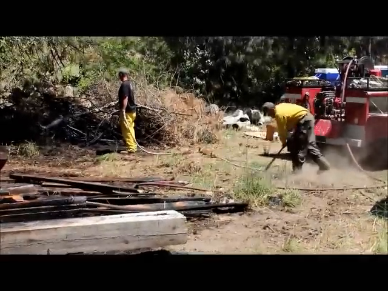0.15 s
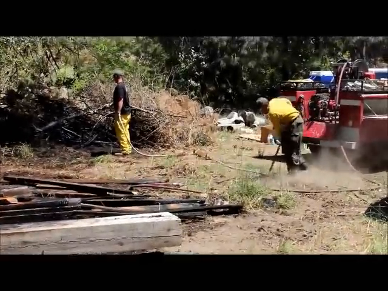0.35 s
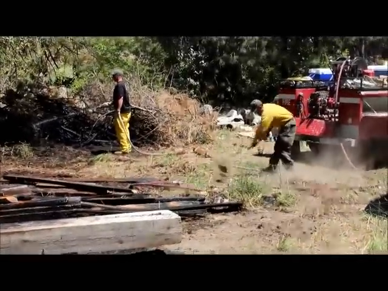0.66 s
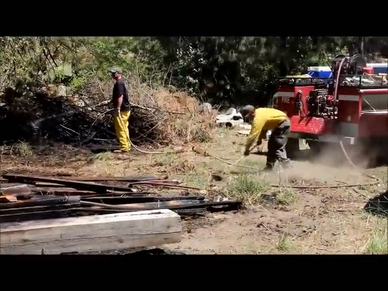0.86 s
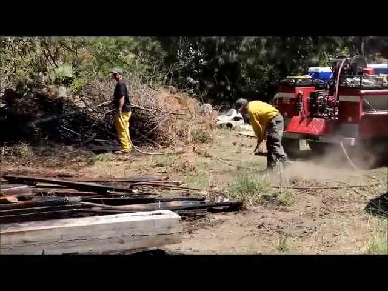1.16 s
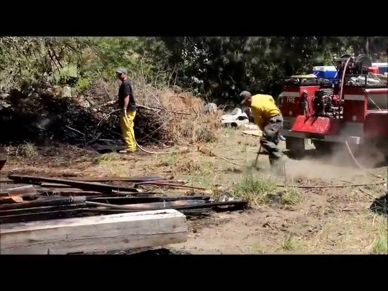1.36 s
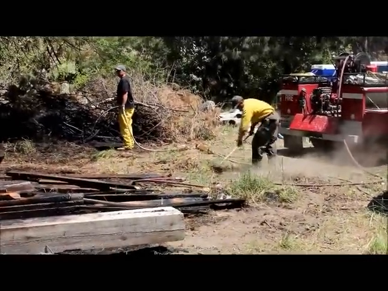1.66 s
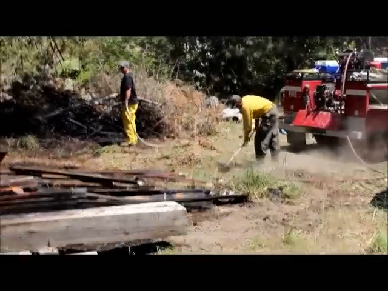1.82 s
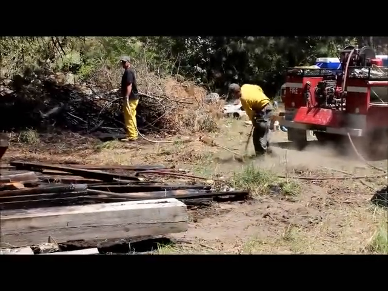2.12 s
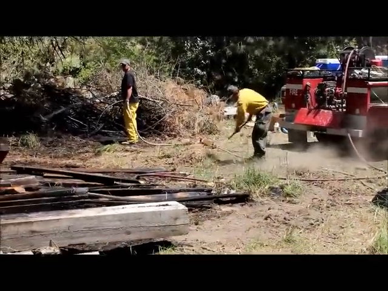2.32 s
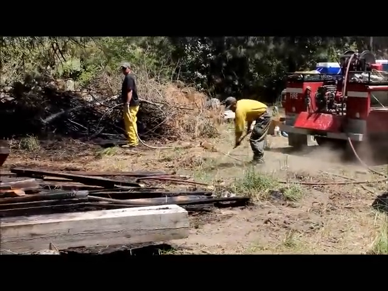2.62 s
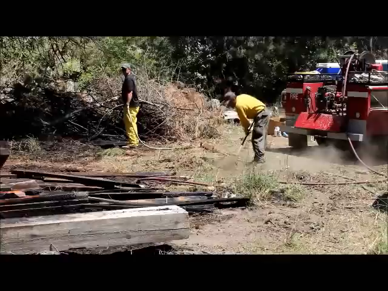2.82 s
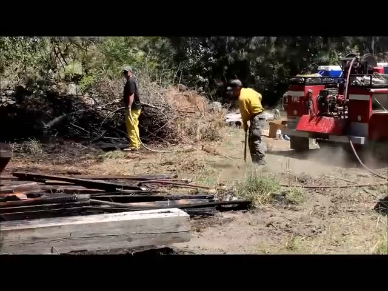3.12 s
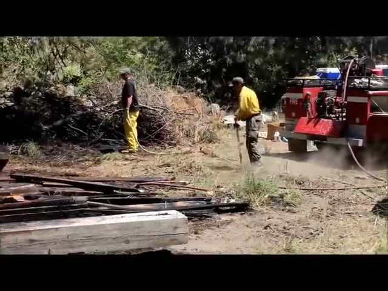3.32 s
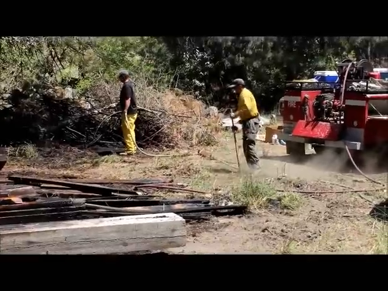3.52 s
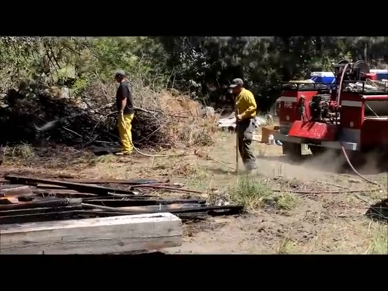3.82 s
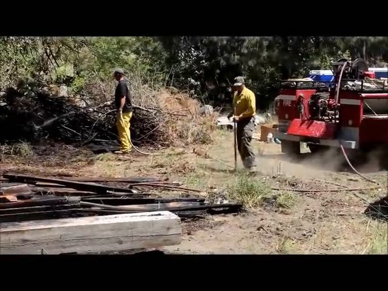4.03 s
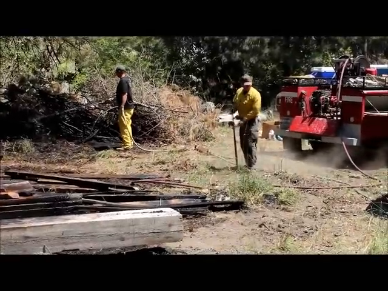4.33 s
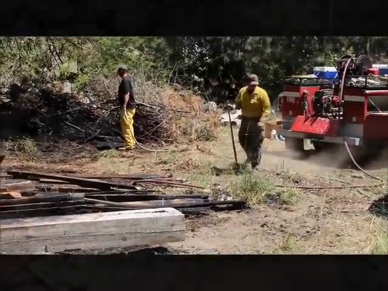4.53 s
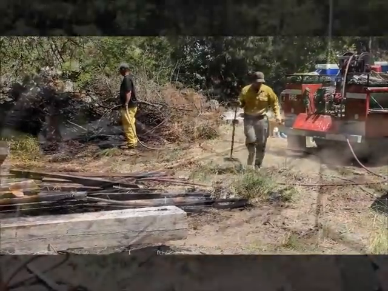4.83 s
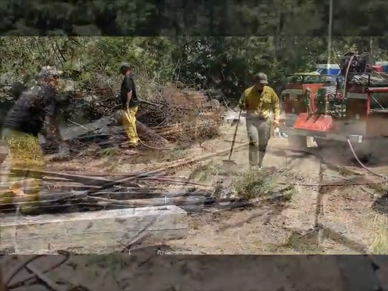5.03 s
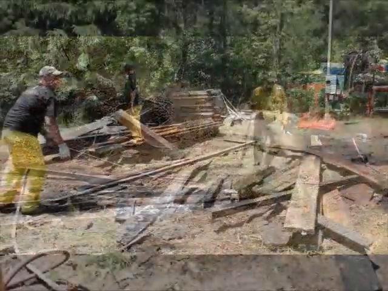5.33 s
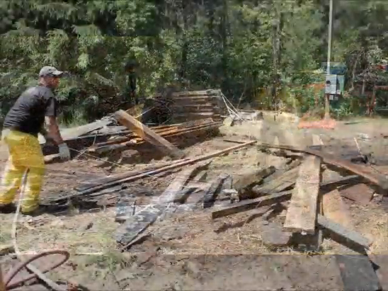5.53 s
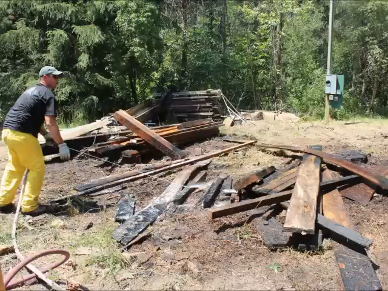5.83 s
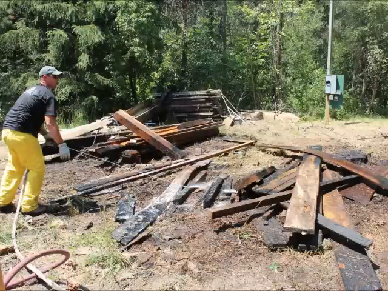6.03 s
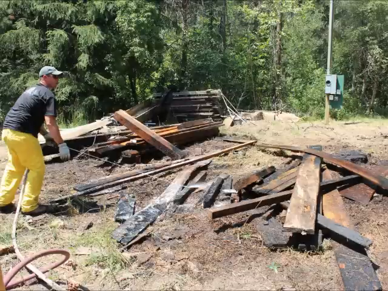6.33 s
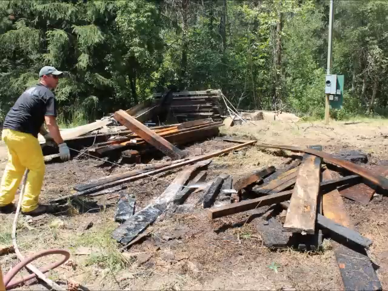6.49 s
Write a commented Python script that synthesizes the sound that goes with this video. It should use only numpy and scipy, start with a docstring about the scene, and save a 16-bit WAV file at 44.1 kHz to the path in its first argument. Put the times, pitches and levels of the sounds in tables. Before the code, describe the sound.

Outdoors in a clearing, a small two-cylinder pump engine on a fire truck runs fast and steady, a throaty drone with rapid thuds, ticking valves, rattling sheet metal and fan noise. A second engine hums underneath. In the first three seconds a hoe bites gritty dirt five times, with faint steel clinks. Just before six seconds everything stops dead. Mono microphone, little echo.

```python
"""Brush truck pump in a clearing

A small air-cooled V-twin pump engine runs near 3280 rpm, its speed hunting slightly under the governor.
Crank harmonics and shaped noise make its thuds, drone and bark; noise bursts make ticks, rattle and hiss.
Steady noise is the cooling fan; a second engine's harmonics and a few panel tones hum below.
A hoe bites the dirt five times in the first three seconds: decaying grit noise and ringing steel.
The microphone hears it in mono, with a short ground bounce on the hiss. Just before six seconds all stops."""
import sys
import numpy as np
from scipy import signal
from scipy.fft import rfft, irfft, next_fast_len
from scipy.io import wavfile
from scipy.ndimage import map_coordinates

SR = 44100
rng = np.random.default_rng(int(sys.argv[2]) if len(sys.argv) > 2 else 0)


def bounce(signal):
    """Save signal as a 16-bit WAV file at the path given by the first command-line argument."""
    frames = np.transpose(np.atleast_2d(signal))
    limited = np.clip(frames, -1, 1)
    pcm = np.round(limited * 32767).astype(np.int16)
    wavfile.write(sys.argv[1], SR, pcm)


N = 293706  # length in samples

PUMP_RPM, SECOND_RPM = 3280, 3468  # set speeds of the two engines
STOP_S = 5.982  # all sound ends here
TOP_HZ = 15740  # upper band limit at the microphone
HISS_DB, HISS_FOLLOWS = -36, 1.8  # gas hiss: level about which it moves, dB per dB of the treble's swing
CLATTER_DB, CLATTER_FOLLOWS = -21, 0.51  # the same for block and shroud, before their own trims
FLUTTER_DB, FLUTTER_PER_S = 0.5, 12  # hiss and clatter waver together: depth, knots per second
JITTER_CYCLES, JITTER_PER_S = 0.004, 4  # the crank strays ahead and behind: depth, knots per second

# The pump engine's note, before it wavers. Each row: multiple of the four-stroke cycle rate, level in dB rms.
PUMP_HARMONICS = [(2, -33.5), (3, -42), (4, -40.5), (5, -29.5), (6, -32), (7, -31.5), (8, -45.5), (9, -34),
                  (10, -38.5), (13, -41.5), (14, -42), (15, -42), (18, -41.5), (19, -44), (21, -46.5),
                  (22, -47), (24, -32.5), (26, -33.5), (27, -36), (28, -34.5), (29, -35.5), (30, -29.5),
                  (31, -33), (32, -28), (33, -38.5), (42, -37.5), (44, -41.5), (48, -45), (50, -40.5),
                  (56, -42.5), (60, -40), (78, -40.5), (84, -43)]
# The second engine's hum, before it wavers. Each row: multiple of its cycle rate, level in dB rms.
SECOND_HARMONICS = [(1, -48.5), (2, -47.5), (3, -35), (4, -36.5), (5, -41.5), (7, -33.5), (8, -43),
                    (10, -35)]
# Humming truck panels. Each row: frequency in Hz, level in dB rms.
PANEL_TONES = [(67, -45), (123.4, -43), (250, -40.5), (257, -43.5)]
# The two cylinders' firings. Each row: place in the cycle 0-1, length in cycles, relative level in dB.
CYLINDER_FIRINGS = [(.17, 0.11, -9.5), (.55, 0.12, -12)]
# Valve contacts. Each row: place in the cycle 0-1, relative level in dB.
VALVE_CONTACTS = [(0.358, -8.5), (0.441, -4), (.58, 0), (.8, -7.5), (.94, -3.5)]
# Spectrum of the low exhaust puffs. Each row: frequency in Hz, relative density in dB per Hz.
PUFF_SPECTRUM = [(40, -30), (80, -7), (130, -7), (230, -1), (300, -2), (390, -3.5), (480, -12.5),
                 (700, -31)]
# Spectrum of the muffler's bark. Each row: frequency in Hz, relative density in dB per Hz.
BARK_SPECTRUM = [(300, -34.5), (500, -12), (620, -1.5), (720, 1), (880, -2), (980, -2.5), (1100, -14),
                 (1600, -32)]
# Spectrum of the shaken engine block. Each row: frequency in Hz, relative density in dB per Hz.
BLOCK_SPECTRUM = [(500, -24.5), (1050, -2), (1650, 1), (2300, -0.5), (2700, -5.5), (4200, -15),
                  (5200, -11.5), (7000, -30.5)]
# Spectrum of the gas hiss. Each row: frequency in Hz, relative density in dB per Hz.
HISS_SPECTRUM = [(2500, -17), (5000, 2), (5900, 1.5), (6300, -2), (7000, -1), (10500, -4.5), (11600, -12),
                 (15900, -13.5)]
# Spectrum of the cooling fan. Each row: frequency in Hz, relative density in dB per Hz.
FAN_SPECTRUM = [(30, -16), (120, 0.5), (500, -6.5), (1500, 1.5), (4000, -8), (7000, -15.5), (12000, -21),
                (16000, -23.5)]
# Ringing sheet metal of the shroud. Each row: frequency in Hz, width in Hz, relative level in dB.
SHROUD_MODES = [(1670, 310, -1.5), (2266, 320, -5), (2875, 170, -0.5), (3487, 150, 2), (3952, 210, 0.5),
                (4594, 110, 0), (5010, 160, -11), (5860, 190, -8.5), (6630, 330, -16)]
# Hoe strokes on grit and stones.
# Each row: start in seconds, grit level in dB, grit pitch in Hz, grit t60 in seconds, blade ring in dB.
HOE_STROKES = [(0.418, -14, 1700, 0.076, -40), (0.774, -18, 4200, 0.068, -37), (1.063, -18, 4990, .06, -20),
               (2.431, -14.5, 1500, .05, -32), (2.79, -24.5, 7000, .04, -36)]
# The hoe's steel blade. Each row: frequency in Hz, level in dB relative to the ring, t60 in seconds.
BLADE_MODES = [(2503, 1, .08), (2934, 0.5, .03), (5790, -2.5, .055), (6627, -6, .055)]
# Course of the muffler's drone and bark. Each row: time in seconds, level in dB.
DRONE_LEVEL = [(0.0, -21), (0.39, -22), (1.22, -20), (5.9, -20)]
# Course of the treble, used for its swing about the mean. Each row: time in seconds, level in dB.
TREBLE_LEVEL = [(0.0, -27), (0.7, -26), (1.55, -28.1), (3.38, -27.2), (3.52, -31.5), (3.7, -27.5),
                (4.35, -29.5), (4.6, -28), (4.78, -31.5), (5.0, -27), (5.42, -30.1), (5.98, -29)]
# The governor hunts. Each row: time in seconds, speed above the set speed in rpm.
GOVERNOR_HUNT = [(0.0, 7), (1.3, 3.5), (1.85, -3.5), (2.35, 0.96), (3.3, 4.5), (3.75, -2.5), (4.8, 1.08),
                 (5.25, -10.1), (5.98, 6)]


def amp(db):
    """Decibels to gain."""
    return 10 ** (np.asarray(db) / 20)


def unit(x):
    """Scale to rms 1."""
    return x / np.sqrt(np.mean(x ** 2) + 1e-20)


def curves(rows):
    """One value per sample for each column after the time."""
    seconds, *columns = np.transpose(rows)
    return [np.interp(np.arange(N) / SR, seconds, column) for column in columns]


def wobble(rate):
    """A smooth random curve through normal draws, rate knots a second."""
    knots = rng.standard_normal(int(N * rate / SR) + 4)
    return map_coordinates(knots, [np.arange(N) * rate / SR], order=2)


def filtered(x, response):
    """x times a response of frequency."""
    m = next_fast_len(N + 8192)  # padded so the end does not wrap onto the start
    return irfft(rfft(x, m) * response(np.fft.rfftfreq(m, 1 / SR)), m)[:N]


def coloured(x, points):
    """x through a (Hz, dB) spectrum with closed ends, at rms 1."""
    hz, db = np.transpose(points)

    def response(f):
        return amp(np.interp(np.log(f + 1), np.log(hz), db, left=-120, right=-120))

    return unit(filtered(x, response))


def ringing(x, modes):
    """x through (Hz, width, dB) resonances of alternating sign, at rms 1."""
    def response(f):
        total = 0
        for k, (centre, width, db) in enumerate(modes):
            damping = 1j * f * width
            total = total + (-1) ** k * amp(db) * damping / (centre ** 2 - f * f + damping)
        return total

    return unit(filtered(x, response))


def noise():
    """Fresh white noise."""
    return rng.standard_normal(N)


def tone(turns):
    """A sine of rms 1 that starts anywhere in its period."""
    return np.sqrt(2) * np.sin(2 * np.pi * (turns + rng.random()))


def pulses(cycle, note, place, smear):
    """Harmonics that crest together once a cycle; the pipe smears them by a fraction of their period."""
    total = np.zeros(N)
    for k, db in note:
        turns = round(k) * (cycle - place) + smear * rng.standard_normal()
        total += amp(db) * np.sqrt(2) * np.cos(2 * np.pi * turns)
    return total


def swell(cycle, place, length, scatter_db):
    """One smooth bump in each cycle, of a new size every time."""
    count = np.floor(cycle - place + 0.5).astype(int)
    size = amp(scatter_db * np.sqrt(3) * rng.uniform(-1.4, 1, size=256))
    bump = np.exp(-0.5 * ((cycle - place - count) / length) ** 2)
    return size[count % len(size)] * bump


def firing_gas(cycle, steady, scatter_db):
    """Turbulence that surges with each cylinder's firing."""
    surges = sum(amp(db) * swell(cycle, place, length, scatter_db) for place, length, db in CYLINDER_FIRINGS)
    return noise() * (steady + surges)


def exhaust(cycle, drone_db):
    """The muffler sounds the cycle's harmonics: the low ones thud, the upper ones drone with the load."""
    load = amp(0.89 * (drone_db - np.mean(drone_db)))
    uneven = cycle + 0.001 * wobble(40)  # no two power strokes take quite the same time
    vigour = amp(0.98 * wobble(24))  # nor push equally hard
    low_rows = [row for row in PUMP_HARMONICS if row[0] < 20]
    high_rows = [row for row in PUMP_HARMONICS if row[0] >= 20]
    thuds = pulses(uneven, low_rows, place=0.46, smear=0.2)
    drone = sum(amp(db + 0.83 * wobble(3.7)) * tone(round(k) * uneven) for k, db in high_rows)
    flicker = amp(0.07 + 1.4 * wobble(45))
    puff_swell = swell(cycle, place=0.43, length=0.12, scatter_db=1.5)
    puffs = coloured(noise() * (0.9 + puff_swell), PUFF_SPECTRUM)
    bark = coloured(firing_gas(cycle, steady=1.0, scatter_db=4.5), BARK_SPECTRUM)
    low_end = vigour * (thuds + amp(-28.5) * puffs)
    return low_end + load * drone * flicker + amp(drone_db - 3.0) * bark


def valve_ticks(cycle, scatter_db, slop_s, t60):
    """Each valve contact repeats its own short noise clack once a cycle, a little early or late."""
    out, t = np.zeros(N), np.arange(SR // 20) / SR
    turns = np.arange(int(cycle[-1]))
    for place, db in VALVE_CONTACTS:
        late, size = rng.uniform(-0.91, 1, size=(2, len(turns)))
        at = np.interp(turns + place, cycle, np.arange(N)) + slop_s * SR * late
        taps = np.bincount(np.clip(at, 0, N - 1).astype(int), amp(db + scatter_db * size), N)
        clack = rng.standard_normal(len(t)) * amp(-60 * t / t60)
        out += signal.oaconvolve(taps, clack)[:N]
    return unit(out)


def clatter(cycle, clatter_db, hiss_db):
    """Firings and valves shake the block and its shroud; gas hisses with each firing."""
    ticks = valve_ticks(cycle, scatter_db=4, slop_s=0.0001, t60=0.0088)
    rattle = amp(1.1 * np.tanh(wobble(90)))  # loose parts chatter unevenly
    block_shake = unit(firing_gas(cycle, steady=0.89, scatter_db=4.0))
    block = coloured(rattle * block_shake + amp(-9) * ticks, BLOCK_SPECTRUM)
    shroud_shake = unit(firing_gas(cycle, steady=0.15, scatter_db=2.0))
    shroud = ringing(shroud_shake + amp(-10.5) * ticks, SHROUD_MODES)
    gas = firing_gas(cycle, steady=0.14, scatter_db=2.5) * amp(2.0 * wobble(500))
    hiss = coloured(gas, HISS_SPECTRUM)
    # the bounce off the ground reaches the microphone 1.1 ms late and ripples the hiss
    hiss = filtered(hiss, lambda hz: 1 + 0.13 * np.exp(-2j * np.pi * hz * 0.0011))
    metal = amp(-3.5) * block + amp(-5.5) * shroud
    return amp(clatter_db) * metal + amp(hiss_db) * hiss


def cooling_fan():
    """The flywheel fan blows almost evenly over the fins: broadband noise, slightly wavering."""
    return amp(-26.5 + 0.64 * wobble(11)) * coloured(noise(), FAN_SPECTRUM)


def truck_hum():
    """The second engine throbs against the pump; panels hum along at their own pitches."""
    t = np.arange(N) / SR
    cycle = t * SECOND_RPM / (2 * 60) + 0.012 * wobble(2)  # two turns to a cycle
    throb = pulses(cycle, SECOND_HARMONICS, place=0, smear=0.24) * amp(1.0 * wobble(12))
    panels = sum(amp(db) * tone(hz * t + 0.049 * wobble(3)) for hz, db in PANEL_TONES)
    return throb + panels


def hoe():
    """The blade bites into grit: a short spray of grains around one pitch, while the steel clinks."""
    out, t = np.zeros(N), np.arange(SR // 5) / SR
    onset = 1 - np.exp(-t / 0.001)
    for start, db, hz, t60, ring_db in HOE_STROKES:
        grit = rng.standard_normal(len(t)) * rng.exponential(size=len(t)) ** 0.5
        band = signal.butter(2, [hz / 1.45, min(hz * 1.3, TOP_HZ)], "band", fs=SR, output="sos")
        spray = amp(db - 60 * t / t60) * unit(signal.sosfilt(band, grit))
        clink = sum(amp(ring_db + level - 60 * t / decay) * tone(f * t) for f, level, decay in BLADE_MODES)
        out[round(start * SR):][:len(t)] += onset * (spray + clink)
    return out


def scene():
    """All pulsing parts of the pump engine follow one crankshaft; hiss and clatter swell together."""
    rpm = PUMP_RPM + curves(GOVERNOR_HUNT)[0]
    cycle = np.cumsum(rpm) / (2 * 60 * SR)  # two turns to a cycle
    cycle = cycle + JITTER_CYCLES * wobble(JITTER_PER_S)
    drone_db, = curves(DRONE_LEVEL)
    treble_db, = curves(TREBLE_LEVEL)
    swing_db = treble_db - treble_db.mean()
    flutter_db = FLUTTER_DB * wobble(FLUTTER_PER_S)
    clatter_db = CLATTER_DB + CLATTER_FOLLOWS * swing_db + flutter_db
    hiss_db = HISS_DB + HISS_FOLLOWS * swing_db + flutter_db
    pump = exhaust(cycle, drone_db) + clatter(cycle, clatter_db, hiss_db) + cooling_fan()
    return (pump + truck_hum() + hoe())[None]


def record(dry):
    """The sound is switched off dead; a very steep low-pass closes above the band limit."""
    running = np.arange(N) / SR < STOP_S
    return filtered(dry[0] * running, lambda hz: 1 / (1 + (hz / TOP_HZ) ** 600))[None]


dry = scene()
out = record(dry)
bounce(out)
```